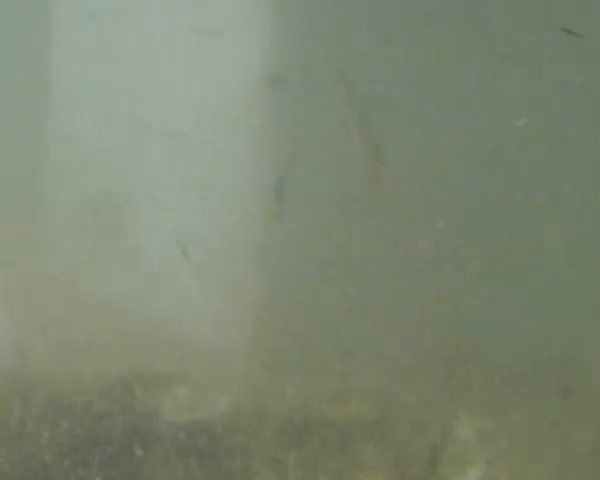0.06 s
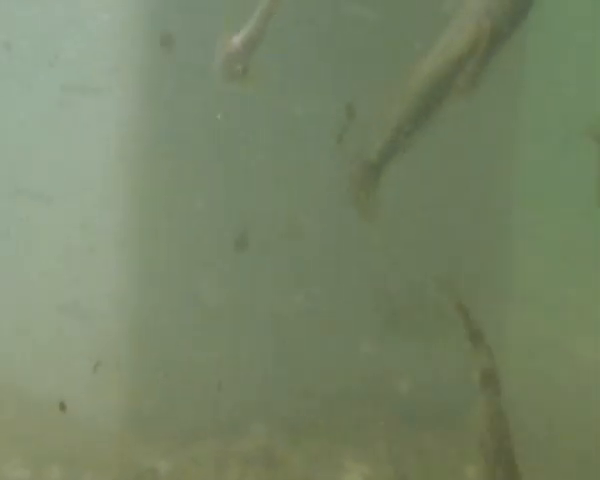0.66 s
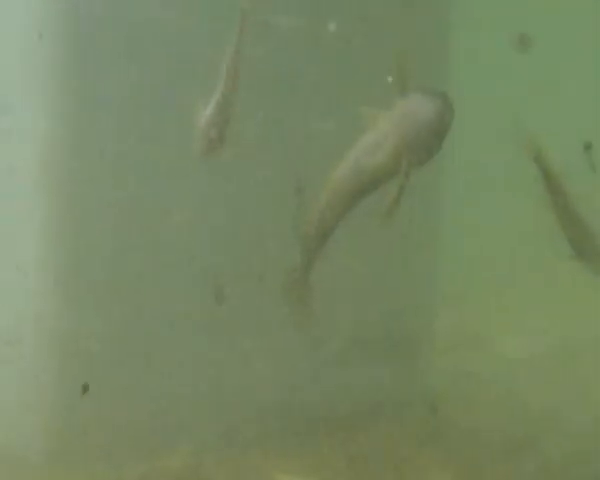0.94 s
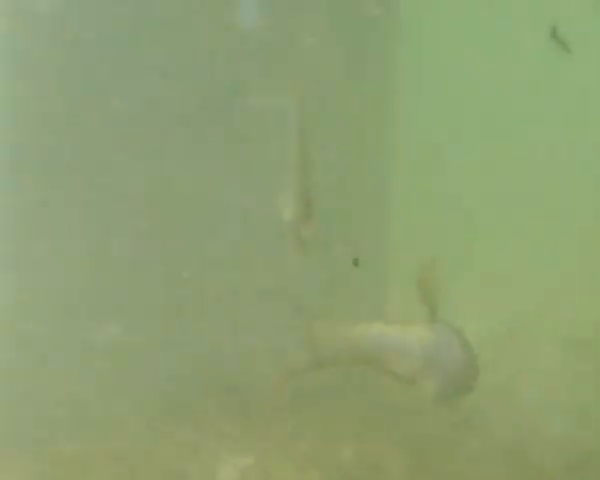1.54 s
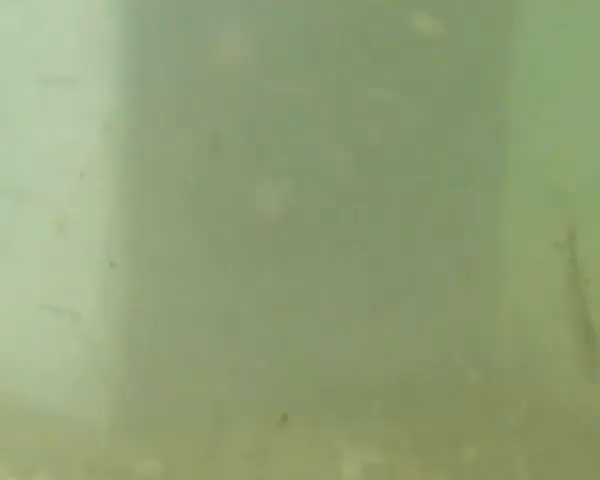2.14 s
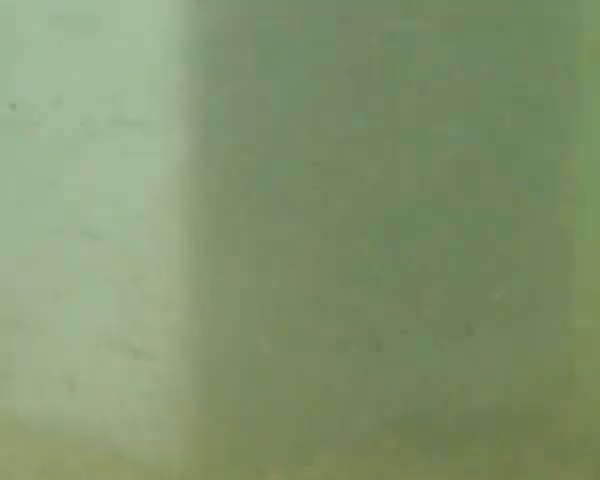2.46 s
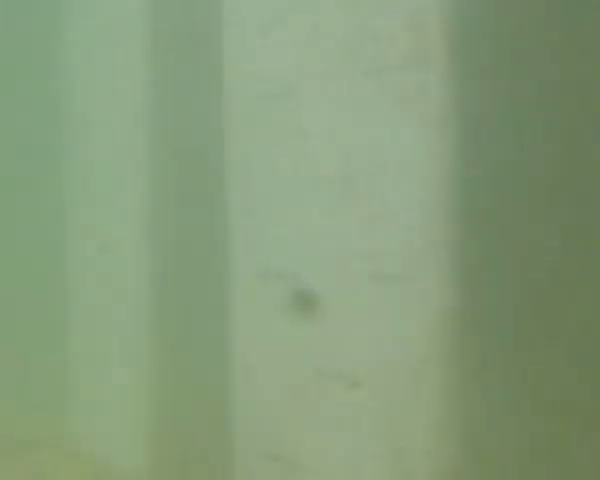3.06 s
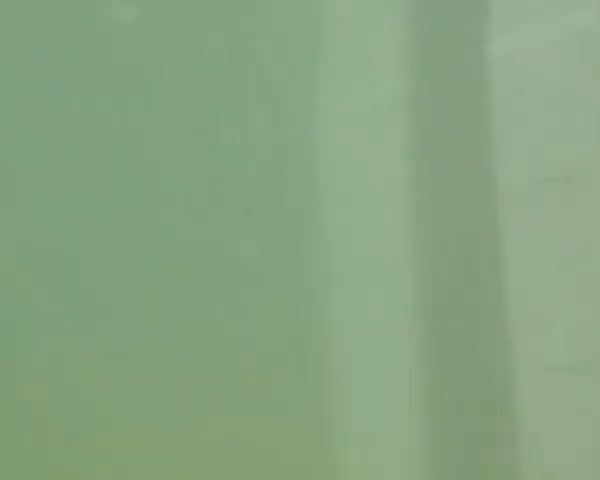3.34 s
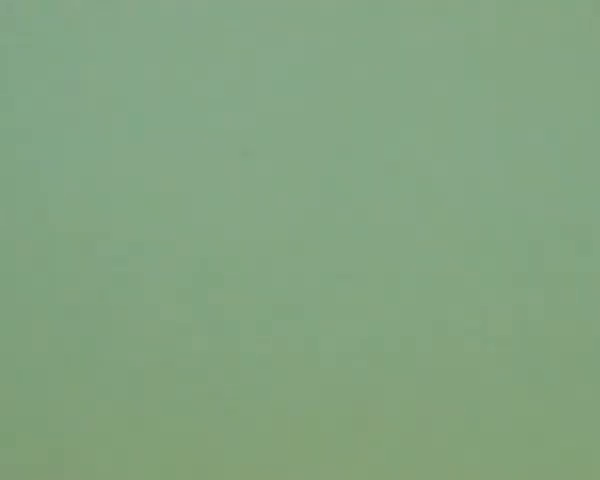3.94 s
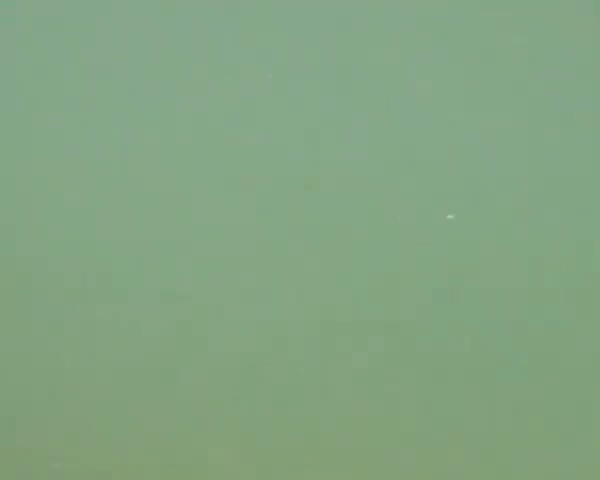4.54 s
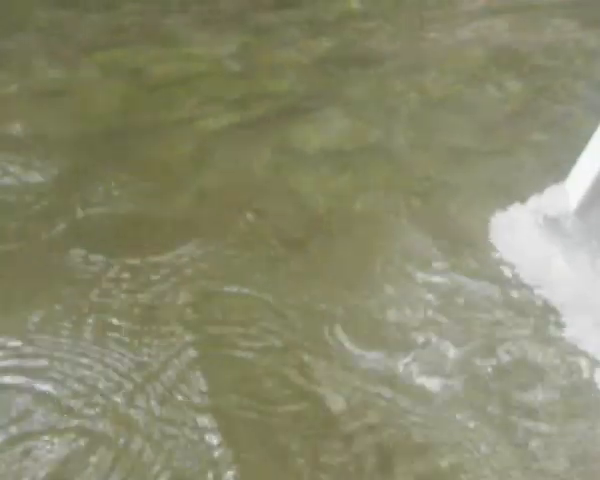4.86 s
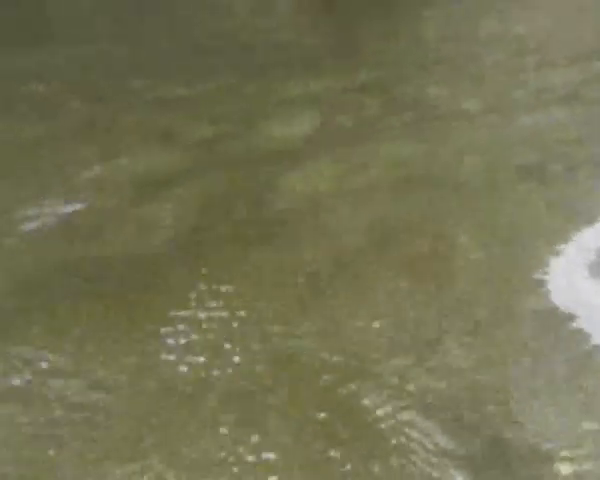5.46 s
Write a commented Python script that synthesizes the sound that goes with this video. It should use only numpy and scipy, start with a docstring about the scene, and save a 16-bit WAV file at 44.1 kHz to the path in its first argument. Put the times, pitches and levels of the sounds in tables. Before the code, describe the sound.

Heard from inside a small waterproof housing in a river, muffled water churns and surges while taps and knocks bump the shell and bubbles blip. A low rumble builds, with plops, faint high pings and short groans of rubbing. The water swells, loud crunchy knocks mark the lift out of the water, and a steady, muted river rush closes the sound. The quality is coarse, with light hiss and fizz.

```python
"""A small camera in a watertight housing hangs in a river beside bridge piers. From the start the
current drums on the housing, knocks excite its few damped modes, and bubbles resonate as short blips.
After three seconds it is hauled up: eddies rumble, then stick-slip rubbing gives a low groan.
Near five seconds three hard knocks overload the microphone as it breaks the surface, and the river is
then heard from the air. Throughout, coarse sampling adds a thin fizz."""
import sys
import numpy as np
from scipy import signal
from scipy.fft import rfft, irfft
from scipy.io import wavfile

SR = 44100
rng = np.random.default_rng(int(sys.argv[2]) if len(sys.argv) > 2 else 0)


def inscribe(sig):
    """Save sig as 16-bit PCM at rate SR to the path in sys.argv[1].

    A 1-D sig is mono; a 2-D sig holds one channel per row.
    Samples are clipped to [-1, 1] before scaling.
    """
    pcm = np.round(np.clip(np.atleast_2d(sig).T, -1, 1) * 32767)
    wavfile.write(sys.argv[1], SR, pcm.astype(np.int16))


N = 247069
RECORDER_RATE_HZ = 8000
# normal modes of the housing: pitch_hz, level_db, t60_s, driving_column (of the knock table)
HOUSING_MODES = [(329.3, 0, 0.05, 1), (600.4, 4.5, 0.033, 2), (713, -15, 0.13, 2), (1400, -7, 0.017, 3),
                 (1570, 6, 0.016, 3)]


def from_db(db):
    """Amplitude ratio of a level in decibels."""
    return 10 ** (np.asarray(db) / 20)


def rms_one(x):
    """Normalisation to unit rms."""
    return x / np.sqrt(np.mean(x ** 2) + 1e-20)


def gain_curve(rows):
    """Amplitude envelope: linear interpolation in decibels between (time_s, level_db) points."""
    time_s, level_db = np.transpose(rows)
    return from_db(np.interp(np.arange(N) / SR, time_s, level_db))


def coloured(x, spectrum):
    """Minimum-phase filtering to a spectrum, band-limited to half the recorder's rate; unit rms."""
    hz, db = np.transpose(spectrum)
    size = 2 ** int(np.ceil(np.log2(N)))
    bin_hz = np.maximum(np.arange(size // 2 + 1) * SR / size, 1)
    magnitude = from_db(np.interp(np.log(bin_hz), np.log(hz), db))
    cepstrum = irfft(np.log(magnitude))
    cepstrum[1:size // 2] *= 2  # folding onto positive time makes the response causal
    response = np.exp(rfft(cepstrum[:size // 2], size)) * (bin_hz < RECORDER_RATE_HZ / 2)
    return rms_one(irfft(rfft(x, size) * response)[:N])


def drift(turns_per_s):
    """Slow random modulation of unit variance."""
    points = rng.standard_normal(N // 100)
    return np.interp(np.arange(N) / SR * turns_per_s, np.arange(len(points)), points) * np.sqrt(3 / 2)


def grains(per_s, spread_db):
    """Shot noise: tiny random impacts of uneven size; unit rms."""
    sizes = from_db(spread_db * np.minimum(rng.exponential(1, N), 4))
    return rms_one(sizes * rng.choice([-1, 1], N) * (rng.random(N) < per_s / SR))


def sprinkle(per_s, spread_db):
    """Poisson process: sparse impulses of about unit size."""
    sizes = from_db(spread_db * rng.uniform(-1, 1, N))
    return sizes * np.sign(rng.standard_normal(N)) * (rng.random(N) < per_s / SR)


def impulse(start_s, level_db):
    """Impulsive excitation, one sample long."""
    out = np.zeros(N)
    out[int(start_s * SR)] = from_db(level_db)
    return out


def ring(x, hz, t60_s):
    """Damped harmonic oscillator: a unit impulse starts a decaying sine of unit amplitude."""
    decay, step = from_db(-60 / (t60_s * SR)), 2 * np.pi * hz / SR
    return signal.lfilter([0, decay * np.sin(step)], [1, -2 * decay * np.cos(step), decay ** 2], x + 1e-18)


def cut(x, hz, kind, order=2):
    """Butterworth low- or high-pass filtering."""
    return signal.sosfilt(signal.butter(order, hz, kind, fs=SR, output="sos"), x)


def churn(spectrum, per_s, spread_db, smooth_db, surge_db):
    """Source-filter model of moving water: impacts over smooth turbulence, wavering in level."""
    drive = grains(per_s, spread_db) + from_db(smooth_db) * rng.standard_normal(N)
    return coloured(drive * from_db(surge_db * drift(30)), spectrum)


def hiss(level_db=-50.5):
    """Self-noise of the microphone: steady and nearly white."""
    # noise spectrum: frequency_hz, density_db
    spectrum = [(100, 3), (1500, 0.5), (2500, -1), (3900, -1.5)]
    return from_db(level_db) * coloured(rng.standard_normal(N), spectrum)


def river():
    """Transmission loss: the closed housing dulls the even rush of the river heard from the air."""
    # envelope of the rush: time_s, level_db
    levels = [(4.92, -58), (4.995, -39.5), (5.012, -28.5), (5.14, -25.5), (5.35, -25), (5.6, -26.5)]
    # its spectrum inside the housing: frequency_hz, density_db
    spectrum = [(35, -59), (60, -54), (81, -24.5), (156, -17), (173, -11), (267, -4), (307, -7),
                (359, -12.5), (398, -8), (544, 1), (825, -12), (1150, -15), (1570, -32.5), (1740, -31),
                (3800, -43), (4940, -60), (8360, -120)]
    return gain_curve(levels) * churn(spectrum, per_s=2500, spread_db=-0.5, smooth_db=3.5, surge_db=-0.46)


def lulls_db(surface_s=4.89, drain_db_per_s=397):
    """Attenuation of (current, eddies): brief in lulls, lasting once the housing leaves the water."""
    # lulls in the water: middle_s, half_length_s, current_depth_db, eddy_depth_db
    lulls = [(3.256, 0.06, 9, 1), (3.842, .026, 10, 9), (4.651, 0.022, 10.5, 0)]
    t = np.arange(N) / SR
    dips_db = sum(np.outer(depths_db, np.exp(-np.minimum(((t - middle_s) / half_s) ** 4, 20)))
                  for middle_s, half_s, *depths_db in lulls)
    drained_db = np.minimum(drain_db_per_s * np.maximum(t - surface_s, 0), 100)
    return -dips_db - drained_db


def surges(edge_db=14):
    """Incoherent addition: surges, each a lopsided bell, sum in power to gains for (swish, drumming)."""
    # faster water, edge_db down one swell before and one ebb after its crest:
    # crest_s, swell_s, ebb_s, swish_db, drumming_db
    crests = [(0.36, 0.14, 0.25, -62, -31), (1.31, .09, 0.066, -52, -31), (1.88, 0.15, 0.074, -38.5, -44),
              (2.49, 0.021, 0.031, -36, -27.5), (2.64, 0.12, 0.15, -35, -25.5),
              (3.03, 0.14, 0.13, -37.5, -20.5), (3.33, .03, 0.14, -46, -46), (3.92, 0.066, 0.22, -42, -33),
              (4.58, 0.35, 0.077, -39.5, -25), (4.72, 0.093, 0.27, -30, -19.5)]
    t, power = np.arange(N) / SR, np.zeros((2, N))
    for crest_s, swell_s, ebb_s, swish_db, drum_db in crests:
        width_s = np.where(t < crest_s, swell_s, ebb_s)
        bell = from_db(-edge_db * np.minimum(((t - crest_s) / width_s) ** 2, 10))
        power += (from_db([[swish_db], [drum_db]]) * bell) ** 2
    return np.sqrt(power)


def current(swish_share_db=-22.5):
    """Flow-induced vibration: the stream drums and taps on the housing; surges add drumming and swish."""
    # envelope of the steady current: time_s, level_db
    levels = [(0.0, -34), (0.15, -38.5), (0.46, -37.5), (0.74, -40.5), (0.94, -41.5), (1.27, -39.5),
              (1.81, -43), (1.95, -38.5), (2.46, -41.5), (2.92, -36.5), (3.03, -39), (3.37, -42.5),
              (4.07, -37.5), (4.72, -34), (4.86, -38.5), (4.9, -48)]
    # dull drumming of the housing: frequency_hz, density_db
    drum_spectrum = [(25, -48), (60, -20), (120, -13), (180, -3), (250, -3), (325, 4), (385, -2),
                     (470, -23), (590, -5.5), (710, -15), (900, -29), (1300, -39), (3500, -46)]
    # brighter swish of the water: frequency_hz, density_db
    swish_spectrum = [(250, -34.5), (470, 4), (620, 16), (780, 13.5), (980, -5), (1270, 5.5), (1600, -6),
                      (2000, -11.5), (2400, -14.5), (3800, -30)]
    steady_gain = gain_curve(levels) * from_db(7)
    swish_surge, drum_surge = surges()
    drumming = steady_gain * churn(drum_spectrum, per_s=450, spread_db=4.5, smooth_db=-4, surge_db=1)
    buffeting = churn(drum_spectrum, per_s=490, spread_db=3, smooth_db=-11, surge_db=0)
    surging = drum_surge * cut(buffeting, 240, "high")  # surges ring the modes but add little rumble
    swish_gain = from_db(7.5) * np.hypot(steady_gain * from_db(swish_share_db), swish_surge)
    swish = swish_gain * churn(swish_spectrum, per_s=740, spread_db=7, smooth_db=1.5, surge_db=2.5)
    touches = steady_gain * from_db(1) * sprinkle(per_s=14, spread_db=6.5)
    taps = sum(from_db(db) * ring(touches, hz, t60_s) for hz, db, t60_s, _ in HOUSING_MODES)
    taps = cut(cut(taps, 570, "low"), 300, "high", order=3)
    return (drumming + surging + swish + taps) * from_db(lulls_db()[0])


def fizz(per_s=70, low_hz=1250, high_hz=2100, pitch_count=10, cycles=14):
    """Bubble resonance: tiny bubbles carried by the surges ring briefly at scattered pitches."""
    strength = from_db(2 + lulls_db()[0]) * surges()[0]
    return sum(ring(strength * sprinkle(per_s / pitch_count, spread_db=6), hz, cycles / hz)
               for hz in np.geomspace(low_hz, high_hz, pitch_count))


def eddy_gain(start_s=3.17, end_s=3.957, level_db=-32):
    """Exponential growth and decay: eddies build as the haul begins, sag during it and then die away."""
    t = np.arange(N) / SR
    rise_db = 70 * np.maximum(start_s - t, 0)
    sag_db = 2.5 * np.maximum(t - start_s, 0)
    fall_db = 77 * np.maximum(t - end_s, 0)
    return from_db(level_db - rise_db - sag_db - fall_db + lulls_db()[1])


def eddies():
    """Turbulent pressure fluctuations rumble as the housing is dragged upward."""
    # rumble spectrum: frequency_hz, density_db
    spectrum = [(15, -20), (35, -13), (85, 1.5), (160, -2.5), (240, -10), (420, -11), (900, -32),
                (3500, -77)]
    return eddy_gain() * churn(spectrum, per_s=200, spread_db=1.5, smooth_db=-4, surge_db=1)


def pings(pitch_hz=2720, detune=0.038):
    """Decaying sines: faint high pings and a fine crackle from the recorder, during the low rumble."""
    # the clearest pings: start_s, level_db
    onsets = [(3.2016, -35), (3.233, -36), (3.3693, -34), (3.378, -47), (3.4291, -34.5), (3.491, -33.5),
              (3.536, -31), (3.598, -34.5), (3.6163, -33), (3.8104, -28.5)]
    pitches_hz = pitch_hz * (1 + detune * rng.standard_normal(len(onsets)))
    clear = sum(ring(impulse(start_s, db + 1), hz, t60_s=0.014)
                for (start_s, db), hz in zip(onsets, pitches_hz))
    crackle = from_db(-3.5) * eddy_gain() * sprinkle(per_s=46, spread_db=9)
    return clear + ring(crackle, pitch_hz, t60_s=0.0041)


def plops():
    """Damped volume oscillation: larger bubbles close by ring low and die quickly."""
    # large bubbles: start_s, pitch_hz, level_db, t60_s
    large_bubbles = [(.228, 1000, -22.5, 0.02), (1.402, 810, -20.5, 0.027), (2.22, 450, -19, 0.023),
                     (2.256, 474, -17, 0.016), (3.233, 200, -7.5, 0.014), (3.304, 940, -23, 0.027),
                     (3.367, 204, -12, 0.032), (3.805, 260, -11, 0.015)]
    ringing = sum(ring(impulse(start_s, db), hz, t60_s) for start_s, hz, db, t60_s in large_bubbles)
    return cut(ringing, 930, "low")


def bubbles(cycles=45, rise=0.015):
    """Free oscillation: each new bubble rings for some dozens of cycles, rising slightly in pitch."""
    # new bubbles: start_s, pitch_hz, level_db
    births = [(0.09, 1400, -40), (1.041, 1410, -38.5), (2.761, 1234, -27), (2.87, 2170, -31),
              (2.881, 1710, -30), (2.999, 2200, -34), (3.011, 1600, -30), (3.019, 1960, -27.5),
              (3.039, 1820, -32), (3.068, 2320, -32), (3.077, 2030, -38), (3.159, 2650, -33.5),
              (3.183, 1360, -33.5), (3.205, 1380, -31.5), (4.1327, 1640, -21.5)]
    out, t = np.zeros(N), np.arange(SR // 10) / SR
    for start_s, hz, db in births:
        age, at = t * hz / cycles, int(start_s * SR)
        envelope = from_db(db + 5 - 60 * age)
        out[at:at + len(t)] += envelope * np.sin(2 * np.pi * hz * t * (1 + rise * age))
    return out


def ticks():
    """Impact transients: grit striking the shell gives quickly damped clicks."""
    # grit impacts: start_s, level_db, pitch_hz, t60_s
    impacts = [(1.7661, -4.5, 1200, 0.0017), (1.7666, -20, 3230, 0.0039), (2.2897, -24, 1900, 0.0055),
               (2.6245, -20.5, 1470, 0.016), (2.946, -13.5, 3200, 0.0068), (2.978, -23, 1400, 0.0067)]
    ringing = sum(ring(impulse(start_s, db), hz, t60_s) for start_s, db, hz, t60_s in impacts)
    return cut(ringing, 450, "high")


def groan(attack_s=0.083, release_s=0.065, jitter=0.006, flutter_db=1.0):
    """Stick-slip friction: rubs slow as they go; the housing favours the harmonic by its lowest mode."""
    # rubs: start_s, length_s, slip_rate_hz, sag_hz_per_s, level_db
    rubs = [(3.52, 0.27, 168, 49.5, -25.5), (3.871, 0.3, 184, 3.5, -26.5), (4.139, 0.3, 177, 92, -20)]
    # harmonics of the slip rate: multiple, level_db
    harmonics = [(2, -2), (3, -19), (4, -20)]
    out, waver = np.zeros(N), 1 + jitter * drift(70)
    for start_s, length_s, slip_hz, sag_hz_per_s, level_db in rubs:
        age_s, at = np.arange(int(length_s * SR)) / SR, int(start_s * SR)
        span = slice(at, at + len(age_s))
        phase = 2 * np.pi * np.cumsum((slip_hz - sag_hz_per_s * age_s) * waver[span]) / SR
        envelope = np.clip(np.minimum(age_s / attack_s, (length_s - age_s) / release_s), 0, 1)
        tone = sum(from_db(level_db + db) * np.sin(round(k) * phase) for k, db in harmonics)
        out[span] += envelope * tone
    return np.sqrt(2) * out * from_db(flutter_db * drift(45))


def knocks(detune=0.035, graze_db=-8, graze_s=0.0013):
    """Modal response: every knock rings the same few damped modes, a little detuned by where it lands."""
    # blows on the housing: start_s, low_mode_db, middle_modes_db, upper_modes_db
    strikes = [(0.271, -16.5, -32, -44), (0.295, -16, -31, -49), (0.323, -5, -34, -33),
               (0.337, -23, -20, -26), (0.3801, -8, -16.5, -26), (0.402, -10, -14.5, -18),
               (0.421, -17, -30, -46), (0.44, -7, -22, -36), (0.502, -21.5, -22.5, -31),
               (0.633, -18.5, -28, -55), (0.691, -11.5, -23, -53), (0.73, -17, -26, -31),
               (0.745, -20, -26, -48), (1.3325, -8, -24.5, -26.5), (1.415, -18.5, -23, -50),
               (1.756, -20, -28, -43), (1.813, -17, -21, -40), (1.999, -23, -23.5, -40),
               (2.125, -14.5, -18.5, -24.5), (2.735, -11.5, -28, -35), (2.824, -16.5, -40, -57),
               (2.857, -34, -21, -19.5), (2.8984, -9, -7, -16), (2.9323, -4, -30, -36),
               (2.958, -7, -19.5, -41), (3.006, -21, -44, -18), (3.018, -28, -14, -12.5),
               (3.064, -11, -17.5, -18.5), (3.112, -18, -22.5, -15.5), (3.155, -14.5, -27, -44),
               (3.304, -27, -24.5, -30), (3.753, -10.5, -17.5, -21), (3.804, -27, -23, -57),
               (4.0083, -8, -10, -47), (4.157, -20, -20.5, -28), (4.405, -37, -10.5, -28),
               (4.483, -43, -25, -21.5), (4.557, -13, -15, -19), (4.578, -8.5, -15.5, -29),
               (4.677, -11, -18.5, -15.5), (4.7345, -4, -14.5, -9.5), (4.834, -13, -21, -11),
               (4.88, -38, -12.5, -20)]
    out, blow = np.zeros(N), np.zeros(SR // 8)
    lead = int(graze_s * SR)
    blow[0], blow[lead] = -from_db(graze_db), 1  # a light touch precedes the main blow
    for strike in strikes:
        at = int(strike[0] * SR) - lead
        for hz, db, t60_s, column in HOUSING_MODES:
            pitch_hz = hz * (1 + detune * rng.standard_normal())
            gain = from_db(strike[round(column)] + db)
            out[at:at + len(blow)] += gain * ring(blow, pitch_hz, t60_s)
    return cut(cut(out, 239, "high"), 1127, "low", order=4)


def hard_knocks(crunch_db=-16, crunch_s=0.0016):
    """Impact excitation: half out of the water the housing rings higher and shorter, with a crunch."""
    # components of the blows at the surface: start_s, level_db, pitch_hz, t60_s
    strikes = [(4.6181, 11, 613, 0.0095), (4.623, -7.5, 894, .02), (4.8713, 9.5, 628, 0.017),
               (4.908, -15, 648, 0.05), (4.914, -12, 1220, 0.0057), (4.914, 7.5, 762, 0.012)]
    out, t = np.zeros(N), np.arange(N) / SR
    for start_s, db, hz, t60_s in strikes:
        blow = impulse(start_s, db)
        out += ring(blow, hz, t60_s) + from_db(-18.5) * ring(blow, hz=990, t60_s=0.012)
        crunch = rms_one(cut(rng.standard_normal(N), 3400, "low", order=4))
        decay = (t > start_s) * np.exp(-np.minimum(abs(t - start_s) / crunch_s, 20))
        out += from_db(db + crunch_db) * crunch * decay
    return cut(out, 444, "high", order=3)


def scene():
    """Superposition: everything reaches one microphone through the housing, over its own hiss."""
    background = hiss() + current() + eddies() + bubbles() + plops() + pings() + river()
    return (background + knocks() + hard_knocks() + ticks() + groan() + fizz())[None]


def record(dry, clip_level=0.92, cutoff_hz=15750):
    """Clipping, then sample-and-hold: spectral images of the lows fizz around the recorder's rate."""
    n = np.arange(N)
    clipped = np.clip(dry[0], -clip_level, clip_level)
    held_at = np.floor(n * RECORDER_RATE_HZ / SR) * SR / RECORDER_RATE_HZ
    held = np.interp(held_at, n, clipped)
    low_pass = signal.ellip(12, 0.1, 80, cutoff_hz, fs=SR, output="sos")
    return signal.sosfilt(low_pass, held)[None]


dry = scene()
out = record(dry)
inscribe(out)
```